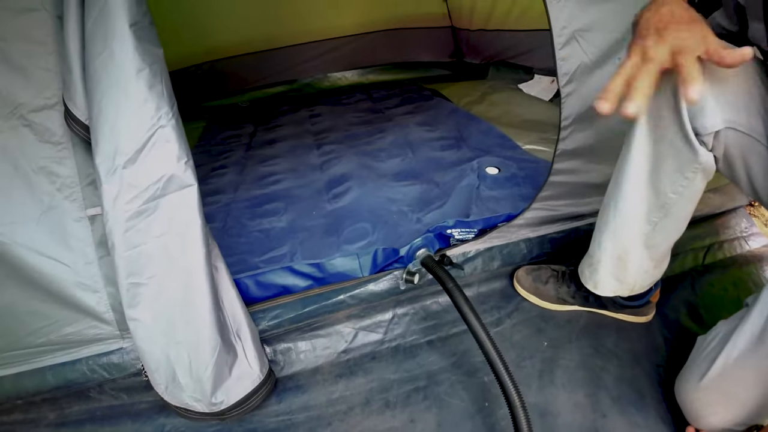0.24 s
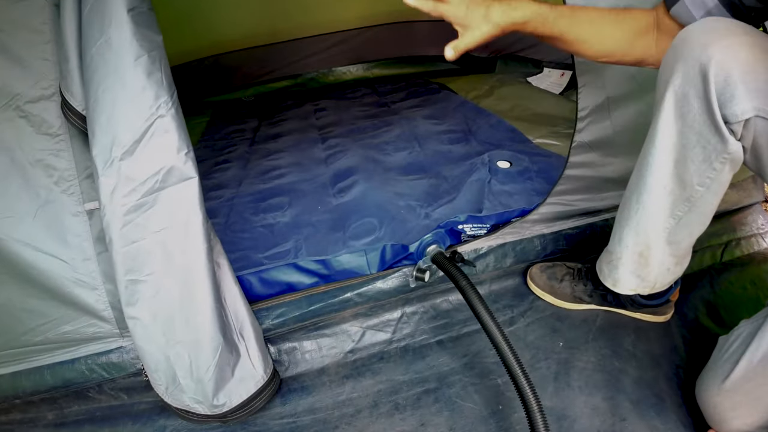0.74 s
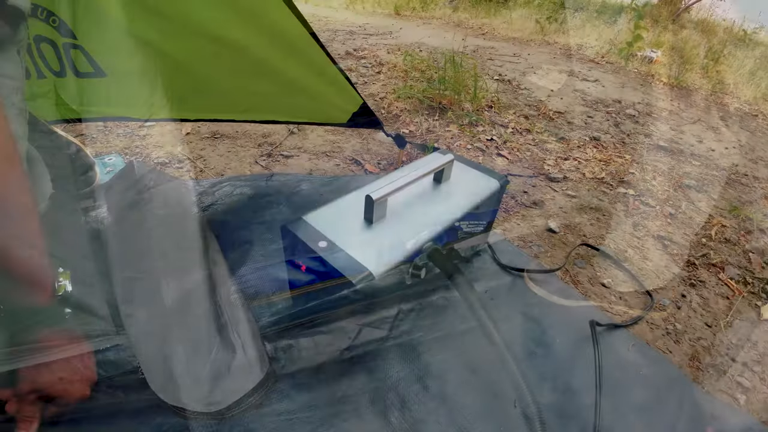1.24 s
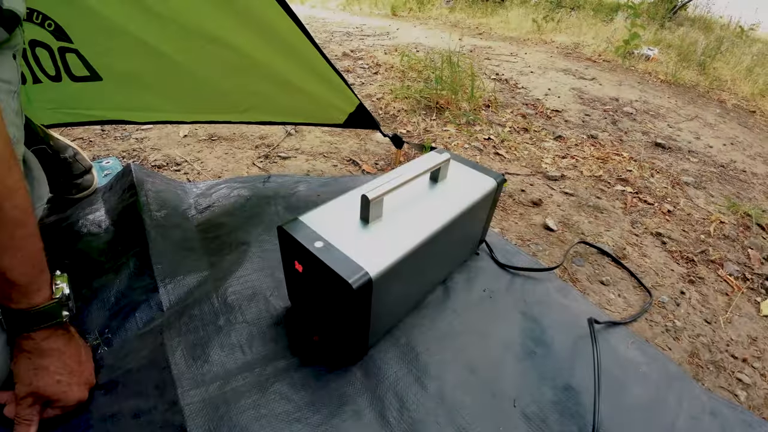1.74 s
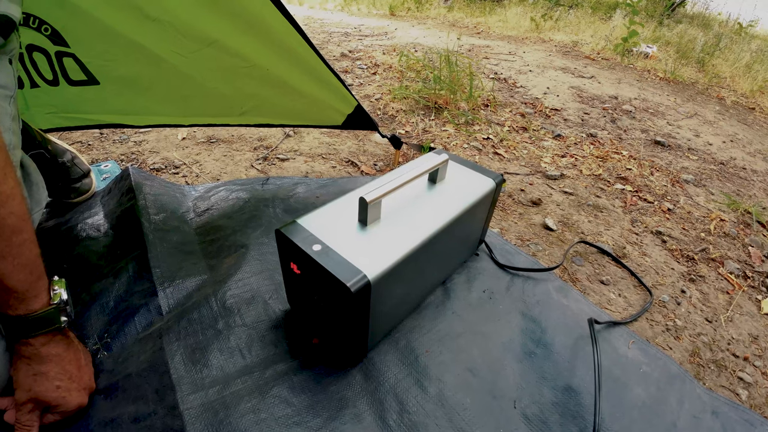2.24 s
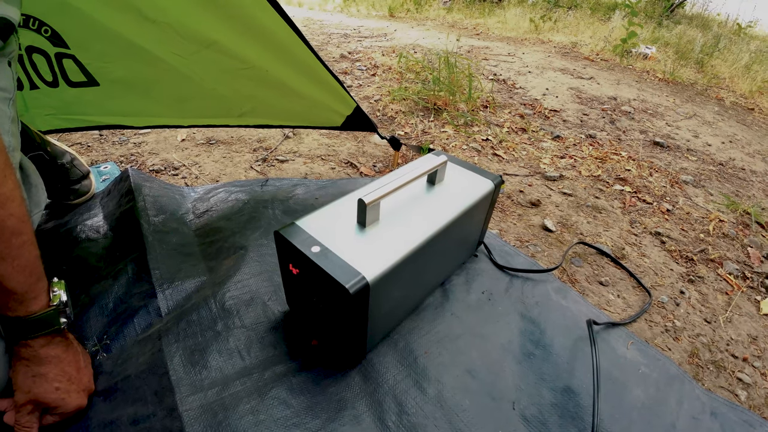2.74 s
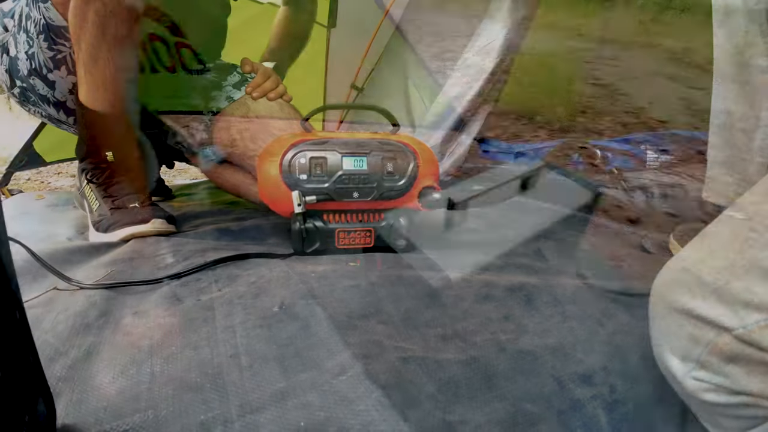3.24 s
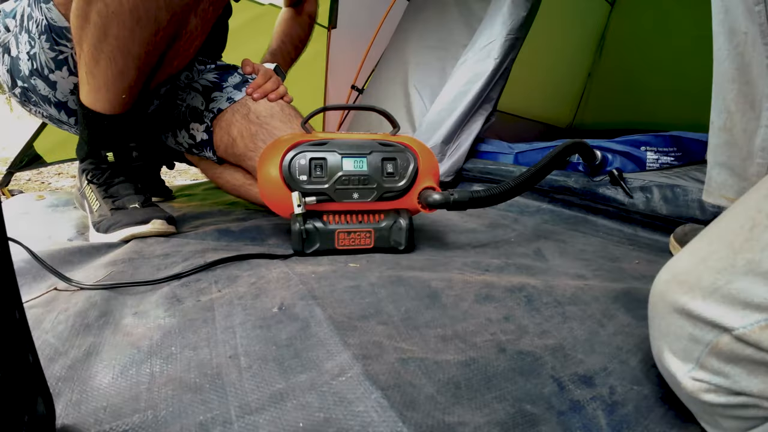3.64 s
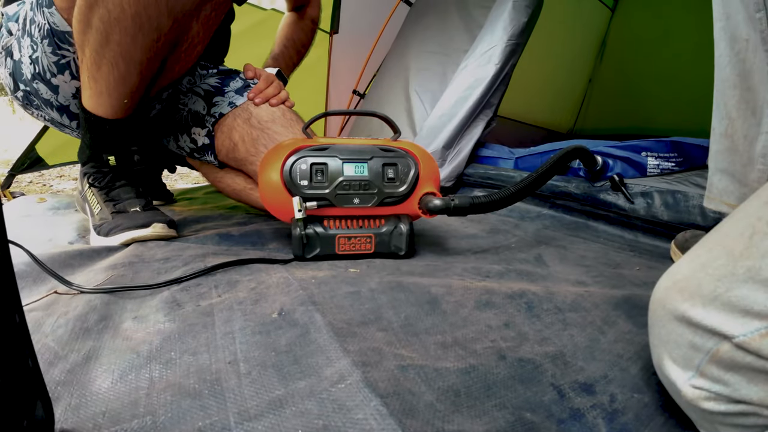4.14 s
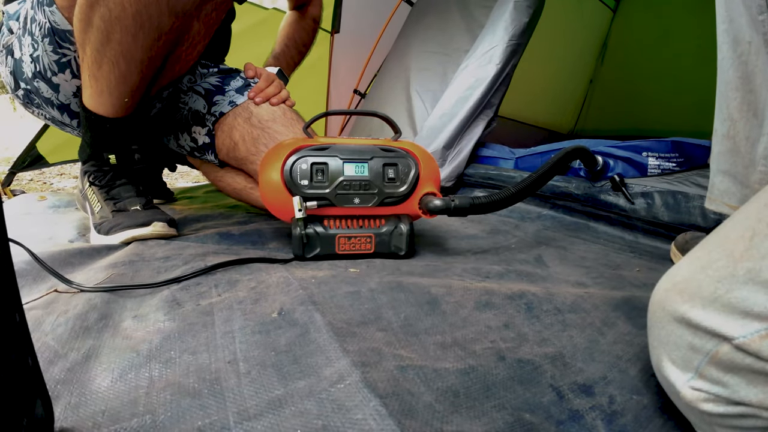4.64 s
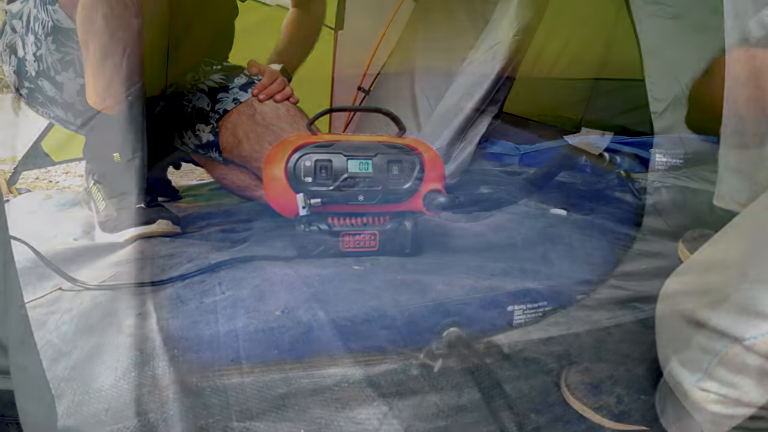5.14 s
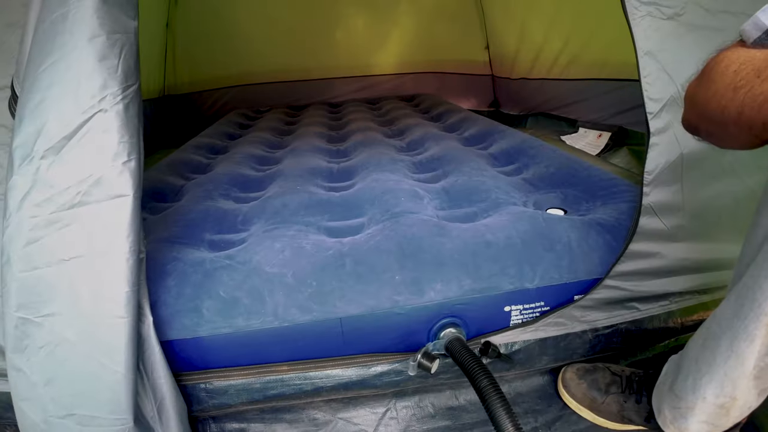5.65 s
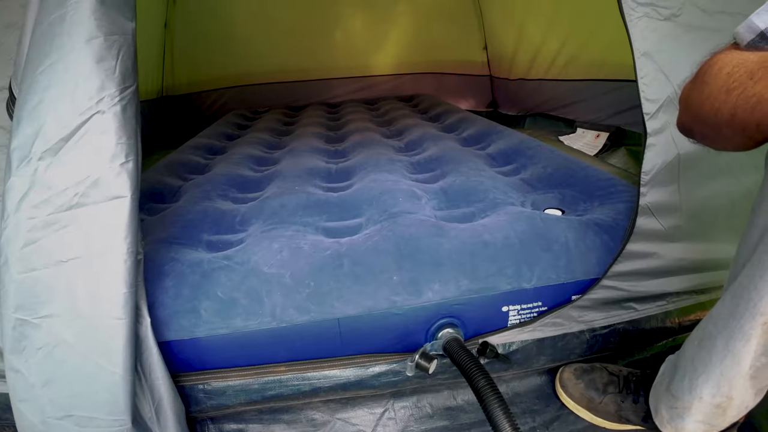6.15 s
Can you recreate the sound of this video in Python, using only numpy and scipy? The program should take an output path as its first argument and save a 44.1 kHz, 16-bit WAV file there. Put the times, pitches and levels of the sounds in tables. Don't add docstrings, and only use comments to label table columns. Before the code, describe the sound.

Close steady motor drone of a mattress inflator, blade whine over airy hiss, crossfading near the end to a higher pitch with low resonance.

```python
import sys
import numpy as np
from scipy import signal
from scipy.io import wavfile
from scipy.ndimage import uniform_filter1d

SR = 44100
rng = np.random.default_rng(int(sys.argv[2]) if len(sys.argv) > 2 else 0)


def ratio_of_db(decibels):
    return 10 ** (np.asarray(decibels, float) / 20)


def output_pcm(signal):
    pcm = np.clip(np.atleast_2d(signal).T, -1, 1) * 32767
    wavfile.write(sys.argv[1], SR, np.round(pcm).astype(np.int16))


N = 281799
T = np.arange(N) / SR


def evened(x):
    return x / np.sqrt(np.mean(abs(x) ** 2) + 1e-20)


def read(points, hz):
    f, value = np.transpose(points)
    return np.interp(np.log(hz + 1), np.log(f + 1), value)


def curves(rows):
    s, *columns = np.transpose(rows)
    return [np.interp(T, s, column) for column in columns]


def drift(rate_hz):
    t = T[::256]
    slow = 0
    for f in np.geomspace(rate_hz / 10, rate_hz, 16):
        slow = slow + np.sin(2 * np.pi * (f * t + rng.random())) / np.sqrt(f)
    return np.interp(T, t, evened(slow))


def bell(t, s, length):
    return np.exp(-((t - s) / length) ** 2)


def whine(at_rest, echoes, shifts, gain_db):
    fade_from_s = 4.39
    flutter_db, flutter_rad, flutters_per_s = .1, .05, 6.
    t = T[::64]
    out = []
    for overtone, left_db, right_db, lead, fade_db in at_rest:
        fading_db = fade_db * np.maximum(T - fade_from_s, 0)
        ride_db = gain_db - fading_db + overtone * flutter_db * drift(flutters_per_s)
        left_swell, right_swell, turn = np.zeros((3, len(t)))
        for s, length, k, *db in echoes:
            if k == overtone:
                left_swell += db[0] * bell(t, s, length)
                right_swell += db[-1] * bell(t, s, length)
        for s, length, k, rad in shifts:
            if k == overtone:
                turn += rad * (1 + np.tanh(2 * (t - s) / length)) / 2
        left, right, turn = (np.interp(T, t, v) for v in (left_swell, right_swell, turn))
        turn = turn + overtone * flutter_rad * drift(flutters_per_s)
        out.append((left_db + ride_db + left, right_db + ride_db + right, lead + turn))
    return out


def tone(turns, order, left_db, right_db, lead, rough=.05):
    skirt_hz, lift_db, hop = 90., .5, 32
    r = np.exp(-np.pi * skirt_hz * hop / SR)
    shake = evened(signal.lfilter([1], [1, -r], rng.standard_normal((2, N // hop + 2))))
    swell, slip = (rough * np.interp(T, np.arange(len(s)) * hop / SR, s) for s in shake)
    angle = 2 * np.pi * (order * turns + rng.random()) + slip
    left = ratio_of_db(left_db) * np.cos(angle + lead / 2)
    right = ratio_of_db(right_db) * np.cos(angle - lead / 2)
    return np.sqrt(2) * ratio_of_db(lift_db) * (1 + swell) * np.array([left, right])


def motor(speed, overtones, orders, hum_swells, gain_db):
    blades = 8
    hunt_hz, hunts_per_s = .13, 7.
    turns = np.cumsum(curves(speed)[0] + hunt_hz * drift(hunts_per_s)) / SR
    out = np.zeros((2, N))
    for k, left_right_lead in enumerate(overtones, 1):
        out += tone(turns, blades * k, *left_right_lead)
    t = T[::64]
    swells_db = sum(db * bell(t, s, length) for s, length, db in hum_swells)
    hum_db = np.interp(T, t, swells_db)
    for order, db, lean_db, lead in orders:
        wander_db = hum_db if order == 1 else 1.1 * drift(7.)
        db = db + gain_db + wander_db
        out += tone(turns, round(order), db + lean_db / 2, db - lean_db / 2, lead, rough=.08)
    return out


def early_motor(gain_db):
    # (time [s], shaft speed [turns/s])
    speed = [(0, 298.65), (0.42, 298.65), (0.6, 298.05), (1.0, 297.8), (1.28, 298.1), (1.45, 297.6),
             (1.82, 297.35), (2.13, 297.9), (2.44, 297.75), (2.76, 297.4), (3.18, 297.65), (3.35, 297.3),
             (3.95, 297.3), (4.25, 297.8), (4.46, 297.5), (4.71, 297.85), (5.04, 297.55), (5.73, 298.1)]
    # (overtone, left level [dB], right level [dB], left lead [rad],
    # fade once the dissolve begins [dB/s])
    at_rest = [(1, -38.6, -31.8, 3.1, 2.3), (2, -35.9, -35.9, -1.38, 6), (3, -31.7, -35, -1.16, 7),
               (4, -38.9, -38.9, 0.16, 1), (5, -47.2, -47.2, -2.34, 2), (6, -59, -59, -1.5, 0)]
    # (waves per turn, level [dB], left minus right [dB], left lead [rad])
    orders = [(1.0, -34.8, -0.0, -0.03), (2.0, -56, 3, 1.), (6.0, -56, 3, -.3), (4.0, -44.1, 9.1, -3.01),
              (5.0, -44.0, -0.3, -0.07), (9.0, -54.7, 5.2, -0.76), (10.0, -61.7, -3.0, -0.48),
              (12.0, -64.5, -17.5, -1.37), (15.0, -53.8, -7.5, -0.09), (17.0, -55.7, 4.4, 2.36),
              (18.0, -60.0, -5.7, -1.32), (20.0, -56.6, -4.6, -1.97), (21.0, -62.1, -4.1, 2.07),
              (22.0, -63.2, 0.5, -0.19), (25.0, -62.9, 1.2, 0.31), (27.0, -63.8, -4.4, -2.06),
              (28.0, -62.0, 3.7, -2.49), (30.0, -64.2, -9.1, -1.97), (31.0, -64.7, -4.6, 2.84),
              (37.0, -60.6, -0.6, 3.05)]
    # (time [s], length [s], overtone, left level [dB], right level [dB])
    echoes = [(0, .08, 3, -6, 0), (.8, .15, 2, 0, 3), (5.78, .15, 3, 3, 0), (1.4, .06, 3, -1, -5),
              (3.6, .06, 2, 2, 2.5), (0.02, 0.25, 1, 8.1, -0.1), (0.02, 0.7, 3, -2.6, 0.4),
              (0.19, 0.25, 2, -2.3, -5.6), (0.39, 0.16, 1, 3.2, 1.7), (0.71, 0.16, 3, 2.4, -3.3),
              (0.95, 0.1, 1, -3.5, -2.5), (1.05, .08, 3, 0, 5), (1.15, .08, 3, -1, 2),
              (1.22, 0.09, 1, 1, .8), (1.45, .1, 1, -3.5, 0), (1.45, .06, 2, 2.5, 2), (.57, .1, 2, 3, 0),
              (3.15, .1, 1, -3, 0), (3.25, .2, 2, -1.5, -3), (4.05, .08, 3, 2, 3), (5.75, .12, 2, -1.5, -3),
              (1.26, 0.06, 3, -15.3, 1.9), (1.35, 0.4, 1, -6.8, 1.1), (1.6, 0.25, 3, 3.8, -10.9),
              (4.62, .08, 2, -2.5, 0), (4.8, .2, 2, -1, -1), (1.74, 0.1, 3, 2.2, 10.0),
              (1.75, 0.4, 2, 3.0, -2.1), (1.94, 0.1, 3, 3.6, -6.5), (2.26, 0.16, 3, -5.3, 1.4),
              (2.27, 0.25, 2, 0.2, -4.2), (2.29, 0.4, 1, 2.7, 3.5), (2.77, 0.25, 3, 2.0, 1.7),
              (2.82, 0.7, 2, 2.0, -7.8), (3.49, 0.4, 3, -0.8, 4.8), (3.89, 0.4, 3, 2.8, -0.1),
              (3.99, 0.7, 2, 0.5, -3.8), (4.02, 0.4, 1, 1.1, 1.9), (5.25, 0.16, 3, 4.2, -2.6),
              (5.62, 0.7, 1, 5.4, 1.6), (6.29, 0.4, 3, -0.9, 4.2)]
    # (time [s], length [s], overtone, level [dB])
    flickers = [(0.06, 0.04, 5, -6.7), (0.05, 0.09, 4, 5.6), (0.19, 0.04, 5, 4.8), (0.26, 0.06, 4, -9.5),
                (0.39, 0.25, 5, 3.4), (0.49, 0.1, 4, -4.9), (0.51, 0.06, 5, 4.6), (0.69, 0.06, 5, -7.3),
                (0.91, 0.1, 4, 3.6), (1.06, 0.1, 5, 5.7), (1.19, 0.04, 4, -4.2), (1.24, 0.04, 4, -10.4),
                (1.41, 0.1, 5, -6.3), (1.46, 0.06, 4, -3.2), (1.66, 0.1, 5, 2.1), (1.84, 0.04, 4, 1.9),
                (1.99, 0.06, 4, -4.6), (2.04, 0.06, 5, -8.6), (2.34, 0.16, 4, 3.1), (2.41, 0.06, 5, 2.4),
                (2.54, 0.04, 4, 2.1), (2.74, 0.4, 5, 2.5), (2.79, 0.04, 4, -4.0), (2.86, 0.1, 4, -7.6),
                (3.01, 0.04, 4, -3.2), (3.16, 0.06, 5, 3.3), (3.19, 0.06, 4, 4.9), (3.31, 0.04, 5, -8.7),
                (3.34, 0.04, 4, -5.2), (3.41, 0.06, 4, -11.9), (3.44, 0.04, 5, 2.2), (3.96, 0.1, 4, 5.0),
                (4.09, 0.16, 5, -8.2), (4.24, 0.1, 4, -9.1), (4.34, 0.04, 5, -3.0), (4.41, 0.04, 4, 2.4),
                (4.49, 0.04, 4, -2.2), (4.54, 0.06, 5, -5.8), (4.61, 0.1, 4, 4.4), (4.89, 0.16, 5, 1.5),
                (5.11, 0.16, 4, 4.9), (5.24, 0.06, 5, -6.2), (5.31, 0.25, 5, -5.4), (5.49, 0.06, 4, -3.7),
                (5.61, 0.04, 5, -5.9), (5.83, 0.16, 4, -4.1), (5.93, 0.06, 5, -9.5), (6.11, 0.06, 4, 2.7)]
    # (time [s], length [s], overtone, level [dB])
    top_flickers = [(0.24, 0.06, 6, 6.4), (0.46, 0.04, 6, 3.8), (0.61, 0.04, 6, 5.0), (0.84, 0.1, 6, -2.3),
                    (1.24, 0.25, 6, 5.6), (1.41, 0.04, 6, -5.3), (1.54, 0.04, 6, 3.5), (1.79, 0.1, 6, -8.5),
                    (2.34, 0.16, 6, 4.4), (2.54, 0.04, 6, -5.9), (2.69, 0.06, 6, -3.4),
                    (3.04, 0.04, 6, -8.5), (3.34, 0.25, 6, 5.8), (3.79, 0.06, 6, -3.9),
                    (3.99, 0.06, 6, 3.7), (4.31, 0.04, 6, -4.0), (4.49, 0.06, 6, 3.6),
                    (4.69, 0.04, 6, -7.1), (5.41, 0.16, 6, -6.4), (6.33, 0.4, 6, -1.8)]
    # (time [s], length [s], overtone, added left lead [rad])
    shifts = [(0.38, 0.12, 2, -0.6), (0.38, 0.12, 5, 2.1), (0.66, 0.05, 5, -2.7), (0.66, 0.12, 3, -3.0),
              (0.7, 0.12, 4, -2.2), (0.86, 0.05, 1, -1.2), (0.94, 0.12, 4, -1.1), (1.02, 0.5, 5, -3.7),
              (1.35, 0.25, 1, -1.2), (1.42, 0.05, 3, -4.3), (1.5, 0.12, 1, -1.5), (1.58, 0.12, 2, 0.6),
              (1.66, 0.05, 3, 0.9), (1.74, 0.05, 5, -1.2), (1.9, 0.05, 3, -1.3), (1.98, 0.05, 4, 1.6),
              (2.34, 0.05, 3, 1.4), (2.62, 0.05, 1, -0.3), (2.9, 0.12, 4, 2.0), (3.02, 0.12, 3, -0.4),
              (3.3, 0.05, 5, 0.9), (3.42, 0.05, 4, 1.7), (4.58, 0.05, 1, 0.7), (4.69, 0.25, 3, -1.6),
              (5.02, 0.5, 4, -1.3), (5.27, 0.25, 2, 1.1), (5.54, 0.05, 5, -2.4), (5.9, 0.12, 3, -1.5),
              (.9, .12, 6, 1.7), (2.05, .12, 6, -1), (2.7, .25, 6, .7), (3.4, .25, 6, 1.3),
              (3.8, .05, 6, -1.6), (4.55, .25, 6, -.9), (5, .12, 6, 1.3), (5.5, .2, 6, -1.3),
              (6, .1, 6, 1.6), (1.97, .12, 2, -.35), (2.62, .1, 2, 1.05), (3.1, .1, 2, -.45),
              (3.72, .08, 2, -.65), (3.35, .08, 1, -.5), (3.7, .1, 1, .5), (4.15, .15, 1, .5),
              (4.8, .1, 1, -.45), (2.35, .08, 3, -.7), (2.62, .1, 3, .6), (5.55, .08, 3, -.4)]
    # (time [s], length [s], level [dB])
    hum_swells = [(0.26, 0.06, -1.5), (0.51, 0.06, -2.0), (0.76, 0.16, -0.8), (1.06, 0.06, -2.1),
                  (1.46, 0.06, -2.2), (1.84, 0.06, -3.5), (2.26, 0.06, -2.0), (2.71, 0.06, -1.7),
                  (3.06, 0.16, -2.1), (3.26, 0.06, -1.6), (3.69, 0.06, -2.5), (3.99, 0.1, -2.4),
                  (4.36, 0.06, -1.4), (4.56, 0.06, -1.9), (5.24, 0.06, -2.7), (5.66, 0.25, 0.4),
                  (6.06, 0.06, -1.4), (6.28, 0.16, 1.7)]
    overtones = whine(at_rest, echoes + flickers + top_flickers, shifts, gain_db=-0.35)
    return motor(speed, overtones, orders, hum_swells, gain_db)


def noise(level_db, patchy_db, ripple_db):
    # (frequency [Hz], likeness [0 to 1])
    likeness = [(100, .96), (180, .93), (380, .975), (520, .8), (600, .5), (690, .9), (830, .95), (950, .6),
                (990, .25), (1030, .72), (1200, .65), (1250, .5), (1300, .92), (1650, .88), (1850, .75),
                (2100, .85), (2300, .4), (3500, .25), (4600, .4), (6000, .2), (10000, .12), (15000, .15)]
    # (frequency [Hz], left lead [rad])
    left_lead = [(100, .02), (380, .1), (430, .6), (560, 1.3), (610, .5), (650, -.7), (690, -1.2),
                 (800, -.7), (900, -1.), (960, -.5), (1020, -3.1), (1210, -3.1), (1260, -.5), (1650, -.7),
                 (1850, 0), (2000, -.6), (2300, -1.2), (2800, -1.2), (3500, .3), (5000, .3), (15000, -.3)]
    # (frequency [Hz], left minus right [dB])
    ear_lean = [(100, 0), (430, .5), (520, 3), (600, -1), (690, -5), (820, -3), (990, -2.5), (1050, 1),
                (1150, 2), (1300, 0), (1900, -1.5), (2150, 2), (2600, -1.5), (3400, -3), (5300, -1),
                (6400, 3), (8300, 2), (10000, 0.5)]
    frames, hz = N // 512 + 5, np.fft.rfftfreq(2048, 1 / SR)
    a, b, c, d, patches = rng.standard_normal((frames, 1025, 5)).T
    patches = uniform_filter1d(patches, size=7, axis=0)
    patches = evened(uniform_filter1d(patches, size=24, axis=1))
    ripple = evened(uniform_filter1d(rng.standard_normal((2, 1025)), 4))
    ripple = ripple * np.clip(hz / 2000, 0, 1)
    same = np.clip(read(likeness, hz), 0, 1)[:, None]
    left = a + 1j * b
    right = same * left + np.sqrt(1 - same ** 2) * (c + 1j * d)
    lean = ratio_of_db(read(ear_lean, hz) / 2)[:, None]
    lead = np.exp(1j * read(left_lead, hz))[:, None]
    z = np.array([left * lean * lead, right / lean])
    z *= ratio_of_db(level_db(hz)[:, None] + patchy_db * patches + ripple_db * ripple[:, :, None])
    return evened(signal.istft(z, nperseg=2048, noverlap=1536)[1][:, :N])


def rush():
    # (frequency [Hz], level [dB per Hz])
    air = [(40, -94.5), (230, -72), (400, -66.5), (620, -68), (1080, -66), (2150, -69.5), (2300, -73.5),
           (3300, -69.5), (4900, -74.5), (5700, -79), (11000, -83.3), (12600, -84), (14000, -87.5),
           (15000, -88)]
    # (frequency [Hz], width [Hz], level
    # [dB])
    peaks_and_dips = [(820, 270, 9.5), (1056, 100, -5.5), (1280, 90, -5), (1840, 120, 1), (2280, 90, -4.5),
                      (4900, 260, -4.5), (1378, 550, 7.5), (1624, 150, 3), (2060, 330, 4), (4500, 220, 5),
                      (5180, 190, 4.5), (5520, 150, -3.5), (6020, 200, 6.5), (7550, 330, 3), (8600, 620, 4),
                      (1720, 70, 2.5), (1830, 70, -3), (2090, 150, -2.5), (2600, 90, 4), (2920, 80, -3.5),
            (3020, 80, 3.5), (3200, 80, -3), (3340, 70, -3), (3490, 90, 3), (3640, 70, -4),
            (3840, 80, -2.5), (9850, 500, -4), (10150, 200, 3), (10850, 130, 5), (12600, 800, -2.5)]
    # (time [s], level [dB])
    loudness = [(0.0, -29.5), (1.6, -30), (2.6, -29), (4.5, -30), (6.39, -30.5)]

    def colour(hz):
        peaks = sum(db / (1 + (2 * (hz - f) / w) ** 2) ** 2 for f, w, db in peaks_and_dips)
        return read(air, hz) + peaks

    level_db = curves(loudness)[0] + .3 * drift(4.)
    return ratio_of_db(level_db) * noise(colour, patchy_db=1.1, ripple_db=1.7)


def late_motor(gain_db):
    # (time [s], shaft speed [turns/s])
    speed = [(4.0, 347.5), (4.4, 347.8), (4.7, 347.65), (4.87, 347.9), (5.3, 347.75), (5.56, 348.35),
             (5.9, 348.25), (6.1, 348.1)]
    # (overtone, left level [dB], right level [dB], left lead [rad], fade [dB/s])
    at_rest = [(1, -32.9, -30.4, -0.67, 0), (2, -39.3, -41, 0.12, 0), (3, -44.5, -43.2, -1.63, 0),
               (4, -47.9, -47.9, -2.3, 0), (5, -55.9, -55.9, -.4, 0)]
    # (waves per turn, level [dB], left minus right [dB], left lead [rad])
    orders = [(1.0, -37.2, 0.7, 0.73), (2.0, -43.3, 0.3, -0.12), (3.0, -59.7, 20.3, 3.12),
              (4.0, -49.6, 1.4, 0.17), (5.0, -49.0, -2.8, 1.27), (7.0, -50.5, 5.6, -0.17),
              (9.0, -53.6, -2.8, -2.56), (10.0, -57.7, -10.9, -1.22), (11.0, -58.1, -12.7, -0.91),
              (12.0, -58.5, -6.3, 2.55), (20.0, -60.8, -7.9, 2.12), (22.0, -71.0, 20.1, -0.88),
              (23.0, -61.7, -6.9, 0.07), (35.0, -62.0, -0.2, 0.48)]
    # (time [s], length [s], overtone, left level [dB], right level [dB])
    echoes = [(4.76, 0.4, 2, -1.8, -5.4), (5.14, 0.16, 3, 2.3, 3.3), (5.25, 0.25, 1, -1, 1.5),
              (5.59, 0.16, 3, 4.0, -3.1), (5.7, 0.1, 1, 4.9, -3.4), (5.91, 0.16, 2, -4.4, -0.6),
              (5.9, 0.08, 3, -6, 2), (6.3, 0.1, 3, 0, 4), (6.27, 0.25, 2, -2.7, -6.5),
              (6.39, 0.6, 1, 0.9, -3.7)]
    # (time [s], length [s], overtone, level [dB])
    flickers = [(4.44, 0.06, 4, -4.8), (4.69, 0.1, 4, 6.1), (4.89, 0.04, 4, -3.4), (4.99, 0.04, 5, -8.2),
                (5.01, 0.04, 5, -10.7), (5.16, 0.06, 5, 3.0), (5.46, 0.1, 4, -2.4), (5.49, 0.04, 5, 3.2),
                (5.61, 0.04, 4, 3.0), (5.73, 0.04, 4, 2.1), (5.81, 0.06, 4, 8.5), (5.96, 0.16, 5, 3.5),
                (6.03, 0.1, 4, -4.8), (6.16, 0.04, 4, 2.0), (6.31, 0.06, 4, -3.9), (6.33, 0.1, 5, -8.0)]
    # (time [s], length [s], overtone, added left lead [rad])
    shifts = [(4.67, 0.25, 1, 0.6), (5.44, 0.05, 3, -0.8), (5.58, 0.12, 3, -1.8), (5.68, 0.05, 1, -0.7),
              (5.82, 0.12, 3, 1.1), (6.0, 0.05, 3, 1.0), (6.06, 0.12, 1, 1.5)]
    # (time [s], length [s], level [dB])
    hum_swells = [(4.56, 0.06, -1.6), (4.89, 0.06, 2.1), (4.99, 0.06, -0.8), (5.24, 0.06, -1.7),
                  (5.36, 0.06, 0.9), (5.76, 0.06, 1.2), (5.96, 0.06, 0.7)]
    overtones = whine(at_rest, echoes + flickers, shifts, gain_db)
    return motor(speed, overtones, orders, hum_swells, gain_db)


def mattress(late_db):
    # (frequency [Hz], level [dB per Hz])
    drumming = [(30, -15), (100, -11), (140, -9), (250, 4), (290, 8), (440, -18), (530, 7), (650, -3),
                (780, -7.5), (870, 10.5), (980, -12), (1500, -42)]
    full_db, taut_db = -33.5, -0.5
    level_db = full_db + np.minimum(late_db, taut_db) + .8 * drift(5.)
    return ratio_of_db(level_db) * noise(lambda hz: read(drumming, hz), patchy_db=1.5, ripple_db=0)


def thump():
    # (time [s], level [dB], frequency [Hz], length [s])
    knocks = [
        (4.645, -49., 50., .013),
        (5.53, -56, 45, .018),
        (5.735, -55, 40, .016),
        (5.95, -55, 35, .016),
        (6.3, -57, 55, .018),
        (6.385, -54, 40, .014),
    ]
    out = np.zeros(N)
    for s, db, hz, length in knocks:
        out += ratio_of_db(db) * bell(T, s, length) * np.sin(2 * np.pi * hz * (T - s))
    return out


def scene():
    # (time [s], early level [dB], late level [dB])
    dissolve = [(0, -1, -60), (3.7, 0., -38), (4.0, 0, -17), (4.5, -0.5, -8.5), (5.0, -1.8, -3.6),
                (5.5, -3, -2.5), (6.0, -4.5, -0.6), (6.39, -8.5, 1)]
    early_db, late_db = curves(dissolve)
    return early_motor(early_db) + rush() + late_motor(late_db) + mattress(late_db) + thump()


def top_cut(x):
    return signal.sosfilt(signal.butter(12, 15420, fs=SR, output="sos"), x)


def record(dry):
    top_hz = 14450
    edge = signal.firwin(601, top_hz, window=("kaiser", 9), fs=SR)
    mix = signal.oaconvolve(dry, edge[None], "same")
    return top_cut(mix)


dry = scene()
out = record(dry)
output_pcm(out)
```